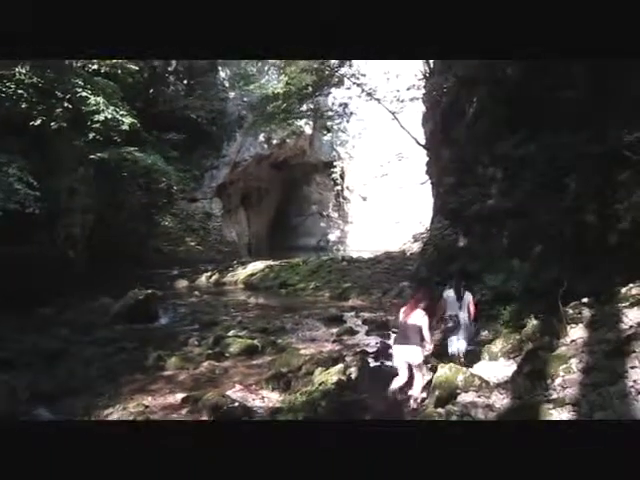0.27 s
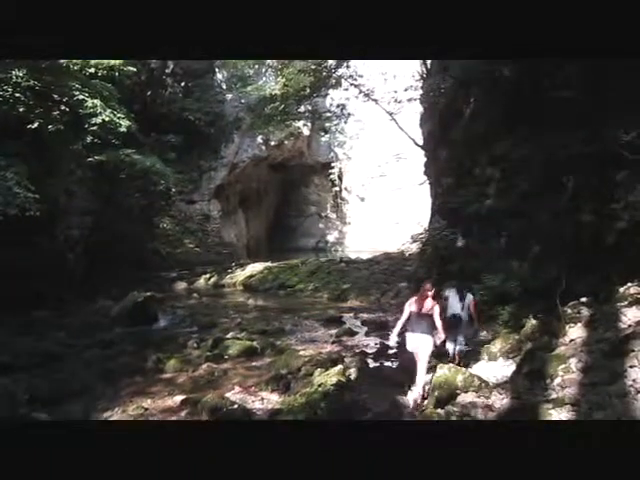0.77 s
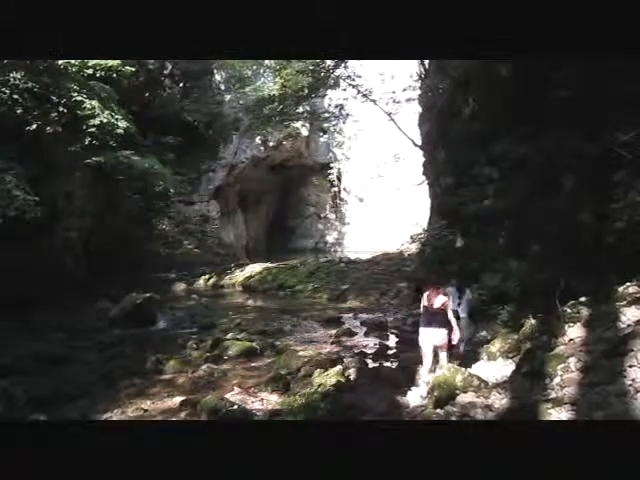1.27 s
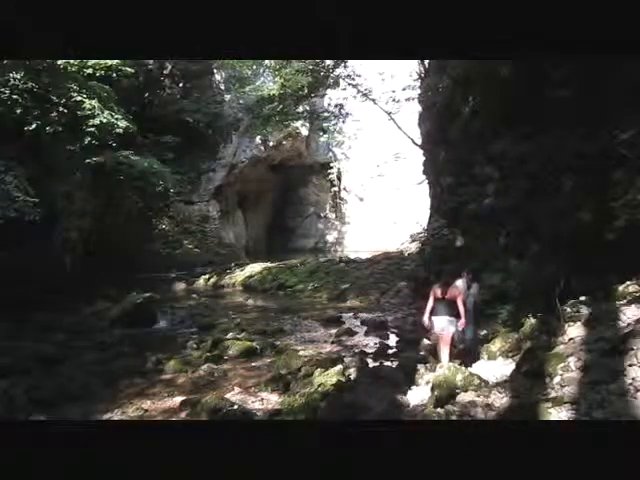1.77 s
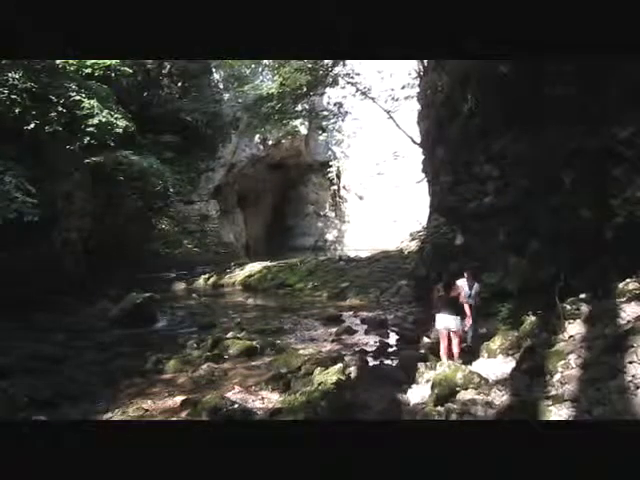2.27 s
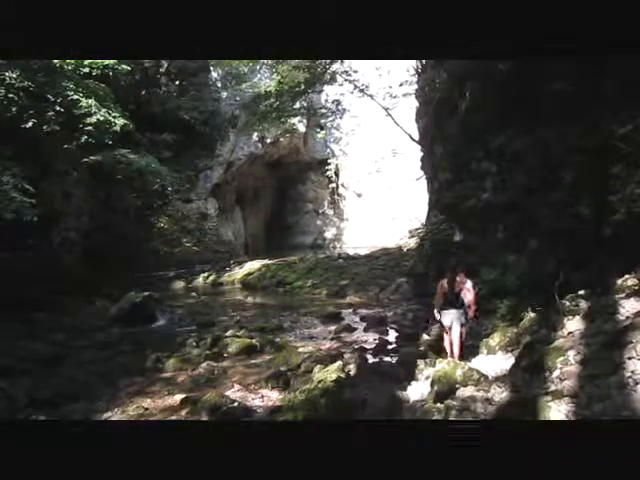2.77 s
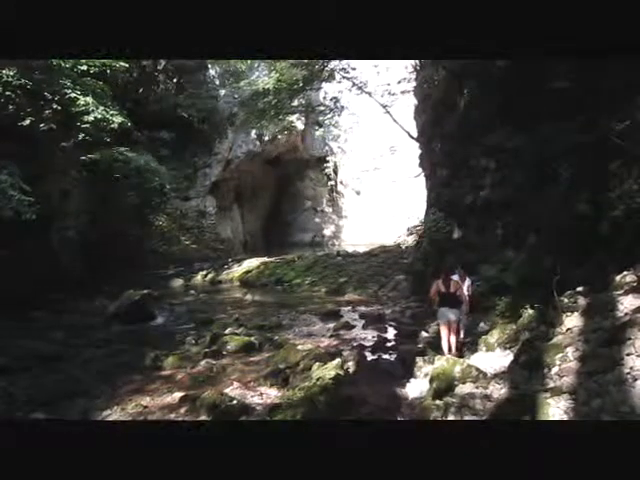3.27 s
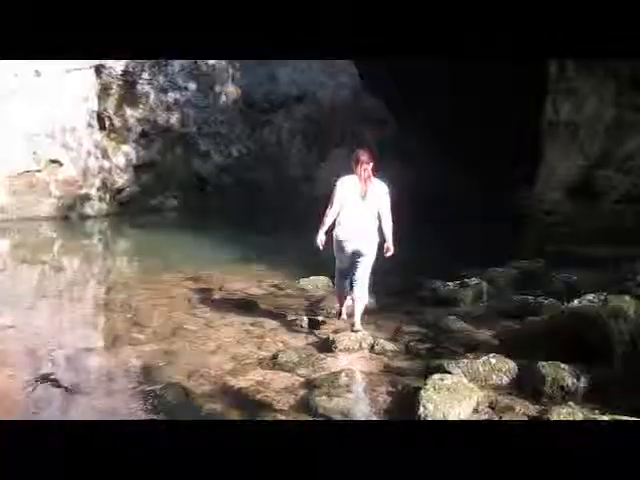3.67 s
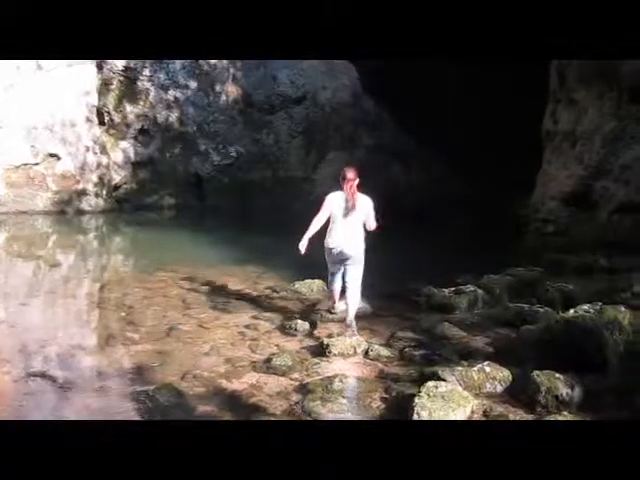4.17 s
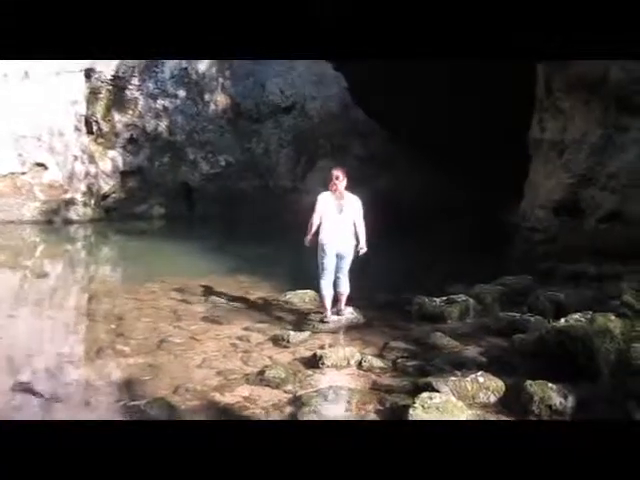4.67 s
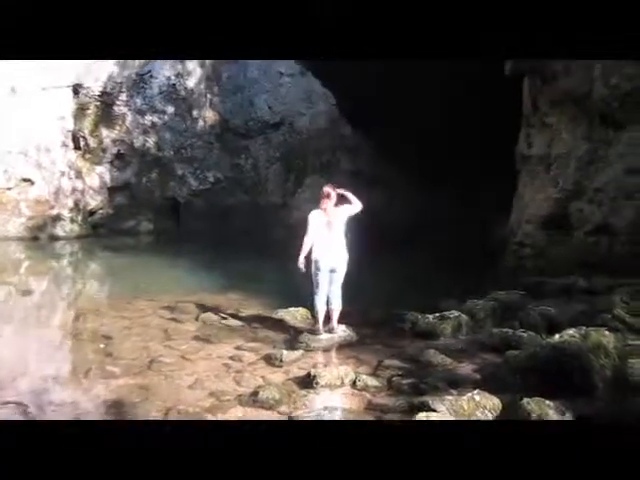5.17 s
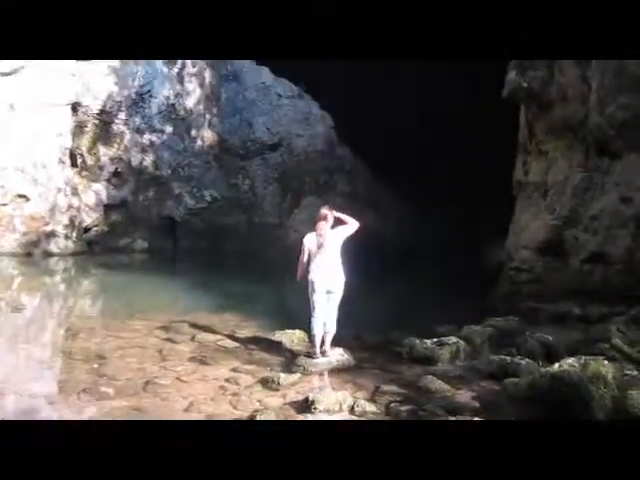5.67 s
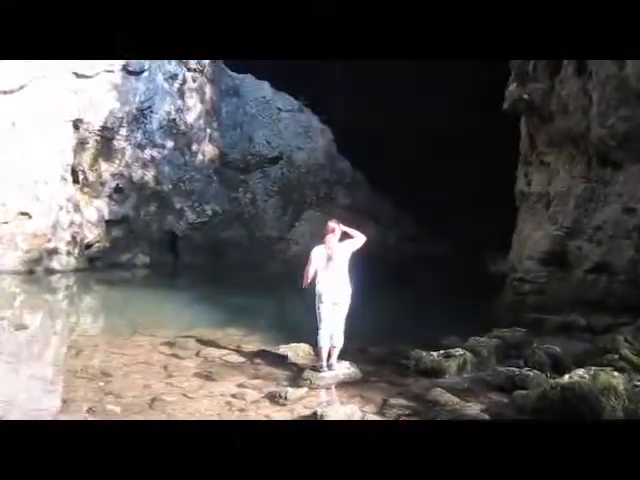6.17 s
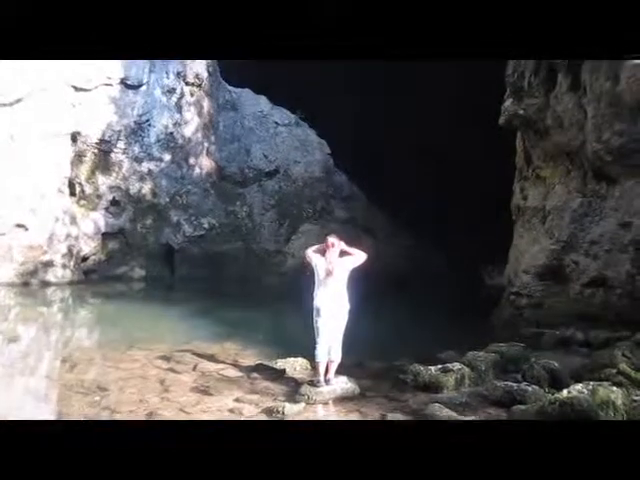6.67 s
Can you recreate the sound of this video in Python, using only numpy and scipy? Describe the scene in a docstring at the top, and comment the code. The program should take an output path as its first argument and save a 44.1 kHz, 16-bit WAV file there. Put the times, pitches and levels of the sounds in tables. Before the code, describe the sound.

Steady far-off water noise stops for a blink, comes back covered by a fumbling hand, knocks and snaps, then swells into a bright nearby rush.

```python
"""A river rushes over stones at a cave mouth, far enough off to melt into an even hiss; a small camera hears it.
The sound stops for a moment and returns nearer the water, muffled until a hand comes off the microphone.
The hand rubs, snaps and knocks the plastic case; light gusts follow. The water is shaped noise, the wind and
rubbing are band-passed noise, the knocks are decaying sines. At listed times the level drops, then climbs back."""
import sys
import numpy as np
from scipy import signal
from scipy.fft import rfft, irfft, next_fast_len
from scipy.io import wavfile
from scipy.ndimage import uniform_filter1d

SR = 44100
rng = np.random.default_rng(int(sys.argv[2]) if len(sys.argv) > 2 else 0)


def unload_audio(sound):
    """Save the sound as a 16-bit wav file, at the path given as the first command line argument."""
    columns = np.transpose(np.atleast_2d(sound))
    # keep every value between -1 and 1, then stretch to whole-number steps
    steps = np.round(np.clip(columns, -1, 1) * 32767)
    wavfile.write(sys.argv[1], SR, steps.astype(np.int16))


N = 304731  # samples

# silence between the far and the near place; then the hand uncovers the microphone
PAUSE_START_S, PAUSE_END_S, UNCOVER_S = 3.3465, 3.4800, 3.975


def undb(db):
    """Decibels to gain."""
    return 10 ** (np.asarray(db) / 20)


def level(x, db):
    """Scale to an rms level."""
    return x * undb(db) / np.sqrt(np.mean(x ** 2))


def walk(rate):
    """Random levels, `rate` new ones per second, smoothed twice into slopes; spread near 1."""
    hold = int(SR / rate)
    steps = np.repeat(rng.standard_normal(N // hold + 1), hold)
    return 1.18 * uniform_filter1d(uniform_filter1d(steps, hold), hold)[:N]


def band(x, hz, octaves):
    """Fourth-order band-pass, `octaves` wide around a centre pitch."""
    edges = np.clip(hz * 2. ** (np.array([-.5, .5]) * octaves), 10, SR * .45)
    return signal.sosfilt(signal.butter(2, edges, "band", fs=SR, output="sos"), x)


# sudden drops in level: start_s, depth_db (before the easing)
LEVEL_DROPS = [(3.481, 3.5), (3.724, 4), (3.742, 10), (3.972, 29.5), (4.143, 26), (4.86, 2), (4.97, 0),
               (5.35, 2), (5.64, 1), (6.17, 2), (6.543, 3.5), (6.56, 3.5)]
CLIMB_DB_PER_S, SETTLE_DB = 40.5, 3  # pace of the return, softness of its end


def drops_db(t):
    """Each drop sets in within 2 ms, climbs back steadily and eases into full level."""
    climbs = [np.where(t >= start_s, depth_db - CLIMB_DB_PER_S * (t - start_s), -99)
              for start_s, depth_db in LEVEL_DROPS]
    lack = np.max(climbs, axis=0)
    eased = SETTLE_DB * np.logaddexp(0, lack / SETTLE_DB)
    return -uniform_filter1d(eased, size=88)


HISS_DB, HISS_FOLLOW = -51.8, .22  # rms outside the drops; share of each drop in dB
OFFSET, OFFSET_FOLLOW = -.0047, 0.21  # constant offset outside the drops; share of each drop in dB


def electronics(duck_db):
    """Hiss is broad noise on a constant offset; both sink less than the river when the level drops."""
    hiss = level(band(rng.standard_normal(N), 6000, 2.6), HISS_DB)
    return hiss * undb(HISS_FOLLOW * duck_db) + OFFSET * undb(OFFSET_FOLLOW * duck_db)


# gusts on the microphone: time_s, peak_db (crest of the rms level)
WIND_GUSTS = [(5.2, -42), (5.52, -54), (5.8, -51), (6.45, -56), (6.85, -56)]
GUST_FALL_DB_PER_S, CALM_DB = 100, -61  # slope on both sides; rms between gusts, outside the drops


def wind(t, duck_db):
    """Light gusts press on the microphone as a deep flutter; each swells and fades evenly in dB."""
    gusts = sum(undb(peak_db - GUST_FALL_DB_PER_S * np.abs(t - time_s)) for time_s, peak_db in WIND_GUSTS)
    calm = undb(CALM_DB + 0.4 * duck_db) * (t > UNCOVER_S)
    flutter = level(band(rng.standard_normal(N), 55, 1.4), 0)
    return flutter * (gusts + calm)


GRIP_DB = -39  # gain outside the drops: fingers shifting over the covered microphone
SLIDE_START_S, SLIDE_PEAK_S, SLIDE_END_S = 4.079, 4.12, 4.142  # the last slide off the case
SLIDE_DB, SLIDE_RISE_DB_PER_S, SLIDE_FALL_DB_PER_S = -36.5, 260, 330  # gain at the peak, slopes


def rub(t, duck_db):
    """Skin slips on plastic: uneven tiny catches, heard through the case as rumble and scratch."""
    catches = rng.standard_normal(N) * undb(3.9 * walk(300))
    rumble = level(band(catches, 180, 1.4), 0)
    rasp = level(band(catches, 800, 1.4), 1)
    # filtered twice for steeper sides
    scratch = level(band(band(catches, 2300, 1.3), 2300, 1.3), -7)
    grip = undb(GRIP_DB + duck_db) * (t > PAUSE_END_S) * (t < UNCOVER_S)
    before = SLIDE_RISE_DB_PER_S * (SLIDE_PEAK_S - t)
    after = SLIDE_FALL_DB_PER_S * (t - SLIDE_PEAK_S)
    slide = undb(SLIDE_DB - np.maximum(before, after)) * (t > SLIDE_START_S) * (t < SLIDE_END_S)
    return (rumble + rasp + scratch) * (grip + slide)


# short knocks and clicks on the case, low or high: start_s, peak_db, swing_hz, direction (+1 or -1)
CASE_KNOCKS = [(3.612, -15.5, 140, -1), (3.6849, -11, 1200, 1), (3.7205, -16, 330, 1),
               (3.7222, -16, 400, -1), (3.834, -21, 130, 1), (3.8832, -23, 700, -1), (3.933, -15, 350, -1),
               (3.9716, -13, 2600, -1), (3.9718, -12, 2900, 1), (3.972, -9, 1100, -1),
               (3.9725, -14.5, 330, 1), (3.985, -50, 300, -1), (3.994, -36, 220, 1), (4.0534, -21, 334, -1),
               (4.0563, -32, 250, 1), (4.0655, -34, 500, -1), (4.0685, -31, 500, 1), (4.1, -23, 500, -1),
               (4.1107, -14, 1100, 1), (4.1181, -8, 685, 1), (4.1201, -15, 806, 1), (4.121, -12.5, 132, -1),
               (4.139, -27, 700, 1), (4.1436, -11.5, 1210, 1), (4.144, -18, 330, -1)]


def case_knocks():
    """Each is about one heavily damped swing; several close together make up one click."""
    out, t = np.zeros(N), np.arange(2048) / SR
    for start_s, peak_db, swing_hz, direction in CASE_KNOCKS:
        knock = direction * np.sin(2 * np.pi * swing_hz * t) * np.exp(-t * swing_hz * 2.5)
        # the swing builds up over a fifth of a cycle
        knock *= np.sin(np.pi / 2 * np.clip(t * swing_hz * 5, 0, 1)) ** 2
        i = int(start_s * SR)
        out[i:i + 2048] += undb(peak_db) * knock / np.abs(knock).max()
    return out


# modes of the plastic shell, before each snap varies them: pitch_hz, level_db (relative)
SHELL_MODES = [(900, -3), (1480, 10), (1650, 4), (2350, 7.5), (2620, 9), (3120, 5), (3450, -18), (4300, -4),
               (4900, -6), (5500, -5), (6200, -9), (7000, -15), (7900, -8), (8900, 7), (10200, -12)]
# snaps of the shell under the fingers: start_s, peak_db, centre_hz
SHELL_SNAPS = [(3.6848, -16.5, 1698), (3.7228, -15, 3100), (3.7232, -31, 9000), (3.7255, -21, 1500),
               (3.7273, -22, 5600), (3.730, -18, 1500), (3.7368, -16, 2400), (3.7374, -19, 1500),
               (3.739, -19, 2400), (3.7385, -28, 9000), (3.7397, -16.5, 1500), (3.7382, -14, 3100),
               (3.7465, -24, 1600), (3.8832, -23.5, 5040), (3.8836, -26, 1500), (3.9714, -21, 2600),
               (3.9717, -26, 8800), (4.0805, -32, 1800), (4.0925, -34, 1500), (4.101, -26, 1900),
               (4.1085, -25, 1500), (4.1105, -24, 2400), (4.1165, -17, 1600), (4.1204, -21, 2400),
               (4.1227, -18, 2600), (4.1263, -24, 2500), (4.132, -30, 2800), (4.1392, -25, 3000),
               (4.1436, -30, 2400)]
# scrapes, each a patter of small snaps: start_s, end_s, peak_db (typical), centre_hz (typical)
SHELL_SCRAPES = [(3.723, 3.732, -22, 1500), (4.082, 4.099, -34, 1300), (4.119, 4.138, -27, 2700)]
PATTER_PER_S, PATTER_SCATTER_DB = 300, 3  # snaps in a scrape, and their spread up or down
RING_GRIPPED_MS, RING_OPEN_MS, RELEASE_S = 2.6, 0.55, 3.95  # decay time of a 2 kHz mode; the grip lets go


def scrape_patter():
    """A dragged finger snaps the shell once at random in each short slot of time."""
    rows = []
    for start_s, end_s, peak_db, centre_hz in SHELL_SCRAPES:
        luck = rng.random((int((end_s - start_s) * PATTER_PER_S), 3))
        times = start_s + (np.arange(len(luck)) + luck[:, 0]) / PATTER_PER_S
        peaks = peak_db + PATTER_SCATTER_DB * (2 * luck[:, 1] - 1)
        centres = centre_hz * 2 ** (luck[:, 2] - .5)
        rows += zip(times, peaks, centres)
    return rows


def snaps():
    """All shell modes start together in a snap and ring out, the higher ones dying sooner."""
    out, t = np.zeros(N), np.arange(2048) / SR
    mode_hz, mode_db = np.transpose(SHELL_MODES)
    rows = list(SHELL_SNAPS) + scrape_patter()
    chance = rng.standard_normal((len(rows), 2, len(mode_hz)))
    for (start_s, peak_db, centre_hz), (detune, scatter) in zip(rows, chance):
        ring_ms = RING_GRIPPED_MS if start_s < RELEASE_S else RING_OPEN_MS
        # the place of the blow favours the modes near one centre
        distance_db = np.minimum(26 * np.log2(mode_hz / centre_hz) ** 2, 38)
        size = undb(mode_db + 2.0 * scatter - distance_db)
        fade = np.exp(-np.outer(mode_hz / 2000, t) * 1000 / ring_ms)
        ringing = np.sin(2 * np.pi * np.outer(mode_hz * (1 + 0.029 * detune), t))
        crack = size @ (fade * ringing)
        # a fingertip is soft: the push builds up over part of a cycle
        crack *= np.sin(np.pi / 2 * np.clip(t * centre_hz * 1.25, 0, 1)) ** 2
        i = int(start_s * SR)
        out[i:i + 2048] += undb(peak_db) * crack / np.abs(crack).max()
    return out


# brief swells of the rush: time_s, rise_db
RUSH_SURGES = [(5.52, 1), (6.5, 0.5)]
SURGE_S = 0.041  # from the crest to 1/e of the rise


def surges(t):
    """The rush swells and sinks back in a bell curve; returns the gain."""
    return undb(sum(rise_db * np.exp(-((t - time_s) / SURGE_S) ** 2) for time_s, rise_db in RUSH_SURGES))


def rush(colour, db, start_s, end_s, swell_db, flicker_db, grain_db):
    """Countless bubbles blur into noise; octave bands swell together, flicker alone and keep a trace of grain."""
    a, b = int(start_s * SR), min(int(end_s * SR), N)
    size = next_fast_len(b - a)
    octave = np.log2(np.maximum(np.arange(size // 2 + 1) * SR / size, 1))
    # bubbles of uneven strength, a few ms each
    grains = undb(grain_db * walk(250))[a:b]
    spectrum = rfft(rng.standard_normal(b - a) * grains, size)
    pitch_hz, density_db = np.transpose(colour)
    spectrum *= undb(np.interp(octave, np.log2(pitch_hz), density_db))
    total, swell = 0, walk(2.23)[a:b]
    for centre in np.arange(4, 15):  # 16 Hz to 16 kHz in overlapping octaves
        share = np.cos(np.pi / 2 * np.clip(octave - centre, -1, 1)) ** 2
        flicker = walk(22.08)[a:b]
        total = total + irfft(spectrum * share, size)[:b - a] * undb(swell_db * swell + flicker_db * flicker)
    out = np.zeros(N)
    out[a:b] = level(total, db)
    return out


# colour of the river from the path, far off: pitch_hz, density_db (relative, per Hz)
FAR_COLOUR = [(15, -56), (25, -27), (81, -20.5), (105, -14), (166, -3.5), (221, -6), (264, -7), (368, 0),
              (476, 0.5), (584, -2.5), (717, -1), (2160, -10), (3790, -18), (9780, -35), (11400, -68.5),
              (14800, -76), (22000, -120)]
# colour of the river through the fingers over the microphone: pitch_hz, density_db (relative, per Hz)
COVERED_COLOUR = [(25, -42), (45, -13), (140, -6), (350, -3.5), (1100, -3.5), (1230, -15), (1600, -16.5),
                  (2400, -20.5), (3250, -26), (3550, -32), (4500, -34), (7000, -46), (11000, -60)]
# colour of the river close by at the pool: pitch_hz, density_db (relative, per Hz)
NEAR_COLOUR = [(35, -46), (60, -20), (124, -12), (161, -6), (273, -4.5), (333, -1), (1060, -0.5),
               (2680, -10.5), (5520, -23.5), (8200, -30.5), (10200, -34.5), (11400, -94), (14800, -80),
               (22000, -120)]
FAR_DB, COVERED_DB, NEAR_DB = -23, -24, -20.5  # rms before surges and drops
# from here the covered water is grainier, and a touch darker above this pitch
GRAINIER_S, DARKER_HZ, DARKER_DB = 3.745, 1200, -0.5


def river(t):
    """Moving water from the path, then through the covering hand, smoother then grainier, then open at the pool."""
    darker = [(hz, db + DARKER_DB * (hz > DARKER_HZ)) for hz, db in COVERED_COLOUR]
    water = rush(FAR_COLOUR, FAR_DB, 0, PAUSE_START_S, swell_db=0.12, flicker_db=0.35, grain_db=0.67)
    water += rush(COVERED_COLOUR, COVERED_DB, PAUSE_END_S, GRAINIER_S, swell_db=.3, flicker_db=0.98, grain_db=1.6)
    water += rush(darker, COVERED_DB, GRAINIER_S, UNCOVER_S, swell_db=.3, flicker_db=1.0, grain_db=2.4)
    water += rush(NEAR_COLOUR, NEAR_DB, UNCOVER_S, N / SR, swell_db=0.12, flicker_db=0.73, grain_db=1.0)
    return water * surges(t)


def scene():
    """Two stretches of river, the hand on the case, wind and electronic hiss; one microphone on both channels."""
    t = np.arange(N) / SR
    duck_db = drops_db(t)
    sound = electronics(duck_db) + wind(t, duck_db) + rub(t, duck_db)
    # the knocks and snaps do not follow the drops
    sound += case_knocks() + snaps()
    sound += river(t) * undb(duck_db)
    # silent in the pause, with edges under 1 ms
    running = uniform_filter1d(1. * ((t < PAUSE_START_S) | (t > PAUSE_END_S)), size=40)
    return np.tile(sound * running, (2, 1))


TOP_HZ = 11050  # the camera passes nothing much above this


def record(dry):
    """The camera rounds the loudest peaks and cuts the top with a steep low-pass."""
    rounded = np.tanh(1.486 * dry) / 1.514
    return signal.sosfilt(signal.ellip(10, .2, 75, TOP_HZ, fs=SR, output="sos"), rounded)


dry = scene()
out = record(dry)
unload_audio(out)
```